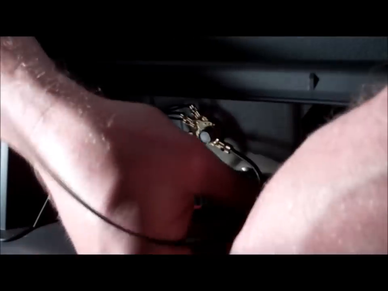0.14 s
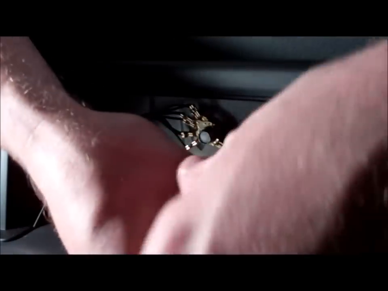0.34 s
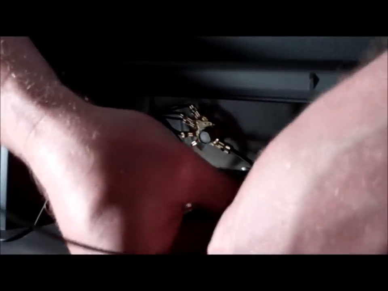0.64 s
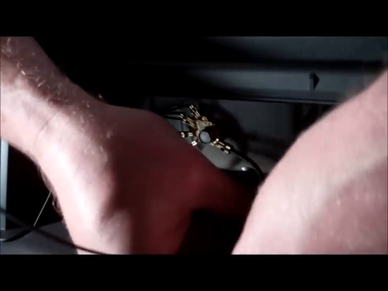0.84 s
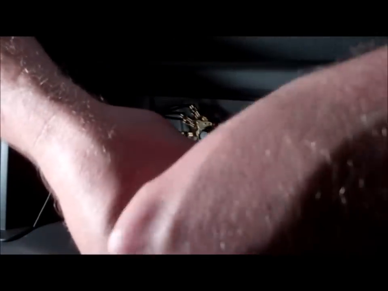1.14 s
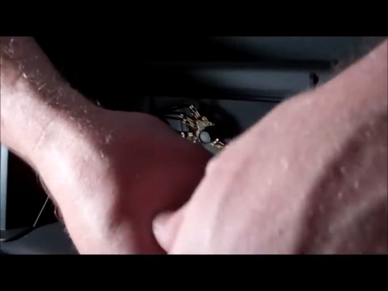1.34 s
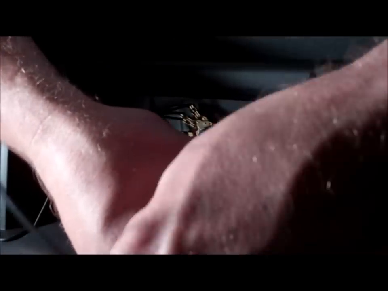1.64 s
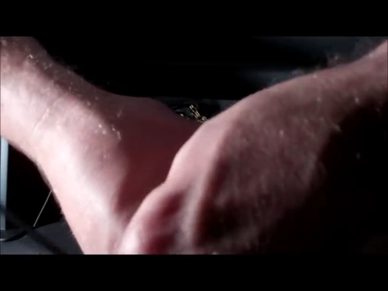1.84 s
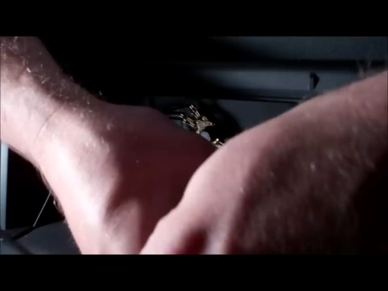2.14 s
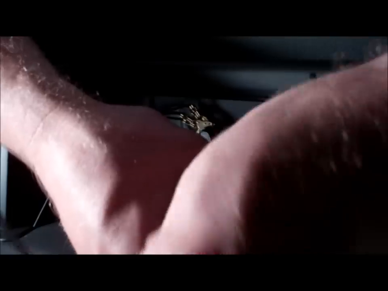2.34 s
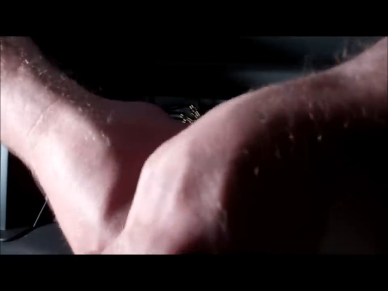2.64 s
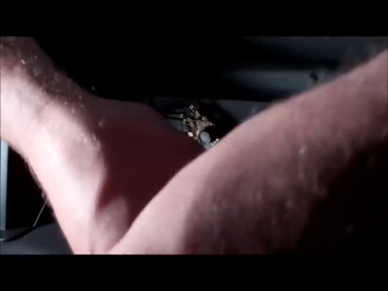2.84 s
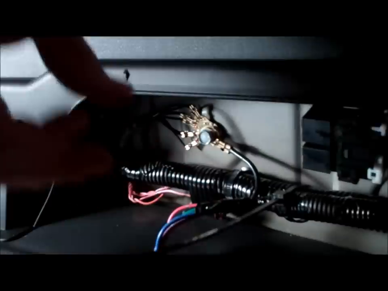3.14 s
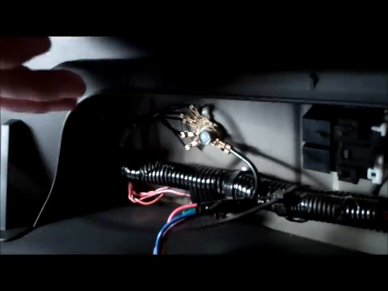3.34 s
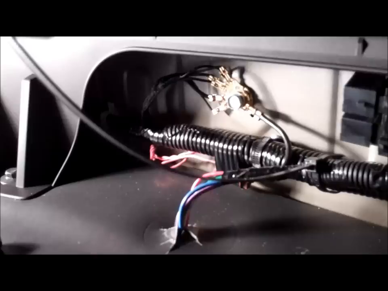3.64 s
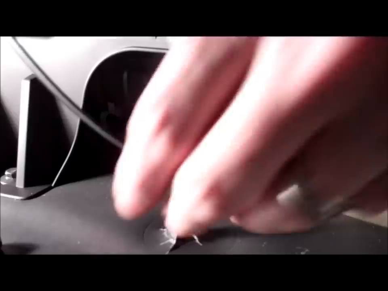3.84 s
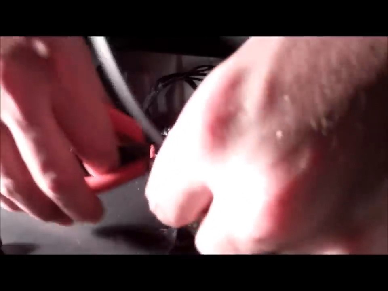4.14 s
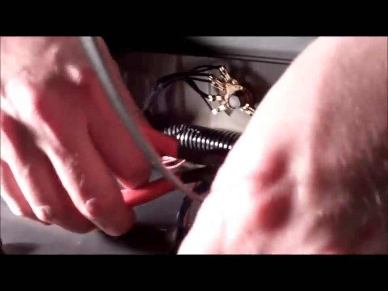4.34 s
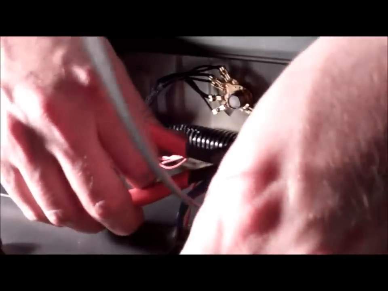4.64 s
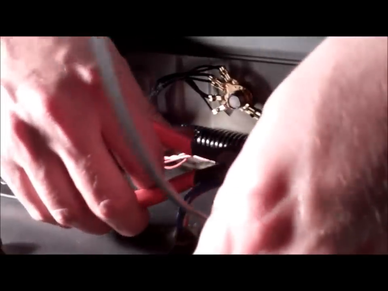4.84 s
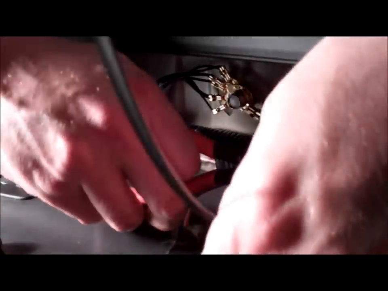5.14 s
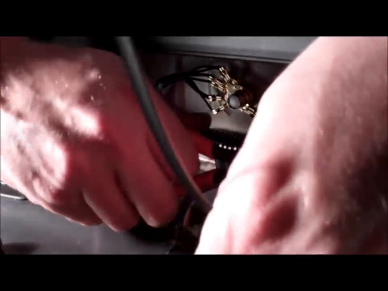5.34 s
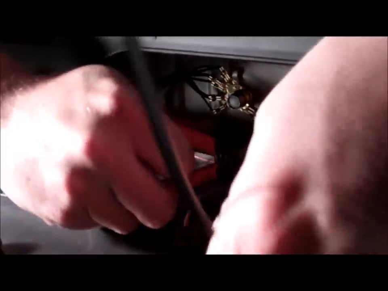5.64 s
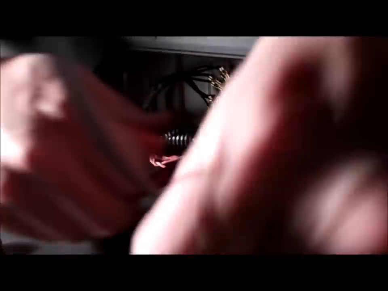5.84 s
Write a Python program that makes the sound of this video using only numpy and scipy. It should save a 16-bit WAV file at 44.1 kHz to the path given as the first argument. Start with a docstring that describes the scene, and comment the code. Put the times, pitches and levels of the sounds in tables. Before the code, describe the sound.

Light plastic ticks and strap rubbing, a sharp ratcheting zip, two late clicks, quiet fumbling, then one hard snip in a hushed vehicle footwell.

```python
"""A nylon zip tie is ratcheted tight round a wiring loom in a vehicle footwell, close to the microphone.
Each tooth is a set of filtered noise bursts: fast at first, then tooth by tooth.
Plastic ticks and knocks are ringing bursts; rubs and shoves are noise shaped by hand movements.
Cutters snip off the tail with a crack and a low thump, over the cabin's steady hush of coloured noise.
A gain control turns everything down briefly after the sharpest clicks."""
import sys
import numpy as np
from scipy import signal
from scipy.fft import rfft, irfft, next_fast_len
from scipy.io import wavfile
from scipy.ndimage import uniform_filter1d, minimum_filter1d

SR = 44100
rng = np.random.default_rng(int(sys.argv[2]) if len(sys.argv) > 2 else 0)


def to_wav(sig):
    """Store sig (one row per channel, or 1-D mono) as 16-bit WAV at the path in sys.argv[1].

    Samples outside -1..1 are clipped; the rate is SR.
    """
    pcm = np.clip(np.atleast_2d(sig), -1, 1) * 32767
    pcm = np.round(pcm).astype(np.int16)
    wavfile.write(sys.argv[1], SR, pcm.T)  # frames by channels


N = 264952
TIME = np.arange(N) / SR
BURST_TIME = TIME[:SR // 4]  # every burst lasts a quarter of a second


def from_db(db):
    """Turn decibels into a plain multiplier."""
    return 10 ** (np.asarray(db) / 20)


def rms_one(x):
    """Scale a sound so that its rms (average strength) is 1."""
    return x / np.sqrt(np.mean(x ** 2) + 1e-20)


def strength_one(x):
    """Scale a short stereo sound to the energy of 3 ms at rms 1."""
    reference = 2 * 0.003 * SR  # two channels
    return x / np.sqrt(np.sum(x ** 2) / reference + 1e-20)


def colour(x, spectrum):
    """Give a sound a spectrum with a minimum-phase filter, which never acts ahead of its input."""
    size = 2 * next_fast_len(x.shape[-1] // 2 + 1)
    pitch_hz, level_db = np.transpose(spectrum)
    bins_hz = np.arange(size // 2 + 1) * SR / size
    shape_db = np.interp(np.log(bins_hz + 1), np.log(pitch_hz), level_db)
    # folding the cepstrum onto positive time makes the filter minimum-phase
    cepstrum = irfft(np.log(from_db(shape_db)))
    cepstrum[1:size // 2] *= 2
    cepstrum[size // 2 + 1:] = 0
    response = np.exp(rfft(cepstrum))
    return irfft(rfft(x, size) * response)[..., :x.shape[-1]]


def resonate(x, hz, width_hz):
    """Ring at one pitch, with gain 1 at the peak; a wider resonance dies sooner."""
    r = np.exp(-np.pi * width_hz / SR)
    feed_in = np.array([1, 0, -1]) * (1 - r * r) / 2
    feed_back = [1, -2 * r * np.cos(2 * np.pi * hz / SR), r * r]
    return signal.lfilter(feed_in, feed_back, x + 1e-18)


# stereo width, as the side signal's level against the middle: (pitch_hz, side_minus_middle_db)
STEREO_WIDTH = [(30, -6), (150, -15.5), (400, -10), (1000, -10), (2300, -2.5), (4400, 0), (13000, -1)]


def spread(pair):
    """Turn two unrelated signals into left and right: alike in the bass, apart in the treble."""
    side = colour(pair[1], STEREO_WIDTH)
    return np.array([pair[0] + side, pair[0] - side])


def pan(x, db):
    """Make the left louder than the right by db."""
    return x * from_db([[db / 2], [-db / 2]])


def add(out, s, sound):
    """Mix a short sound in at time s (seconds)."""
    start = max(round(s * SR), 0)
    out[:, start:start + sound.shape[1]] += sound[:, :N - start]


def burst(t60, tail_db, tail_t60, direct, rise_s):
    """A contact: a spike, dense reflections off hands and trim, and the footwell's short tail.

    t60 and tail_t60 are the seconds each part takes to fall by 60 dB."""
    near_fade = from_db(-60 * BURST_TIME / t60)
    tail_fade = from_db(tail_db - 60 * BURST_TIME / tail_t60)
    build_up = 1 - np.exp(-BURST_TIME / rise_s)
    noise = rng.standard_normal((2, len(BURST_TIME)))
    contact = spread(noise * (near_fade + tail_fade) * build_up)
    contact /= np.sqrt(np.sum(contact ** 2) / 2)
    contact[:, round(min(rise_s, 0.005) * SR)] += direct  # the spike
    return contact


def hush(spectrum, drive=1):
    """Make coloured stereo noise at rms 1, cut off above 14150 Hz; drive varies its strength over time."""
    noise = colour(spread(drive * rng.standard_normal((2, N))), spectrum)
    top_cut = signal.ellip(10, 0.2, 70, 14150, fs=SR, output="sos")
    return rms_one(signal.sosfilt(top_cut, noise))


def friction(spectrum, per_s, grain_db, smooth):
    """Rubbing surfaces: tiny slips of uneven size over a smooth hiss, at rms 1 in all."""
    sizes = from_db(grain_db * np.minimum(rng.exponential(1, N), 4))
    slips = rms_one(sizes * (rng.random(N) < per_s / SR))
    return hush(spectrum, np.sqrt(slips ** 2 + smooth ** 2))


def stroke(s, length, attack_s, release_s):
    """A hand movement: it gathers speed, holds until its length is over, then dies away."""
    age = TIME - s
    gather = np.clip(age / attack_s, 0, 1)
    return gather * np.exp(-np.maximum(age - length, 0) / release_s)


# the pawl dropping over each tooth; levels are relative: (start_s, level_db)
TEETH = [(1.704, -5), (1.7067, -3.5), (1.712, -8), (1.7149, -5.5), (1.7192, -2.5), (1.726, -1),
         (1.7425, -3.5), (1.7634, -6), (1.8003, -5.5), (1.8245, -7), (1.847, -7), (1.8851, -7),
         (1.929, -5.5), (1.9835, -5.5), (2.074, -14), (2.2075, -45), (2.273, -41.5), (2.739, -7),
         (2.7872, -7)]
# each pull begins with a jerk that makes the head and strap louder: (start_s)
PULL_STARTS = [1.704, 2.739]
JERK_DB, JERK_FADE_S = 15, 0.0035
# relative spectra of the pawl's snap, the tie's head and the taut strap: (pitch_hz, level_db)
SNAP_COLOUR = [(1000, -56), (5000, -24), (9000, -19), (11500, -8.5), (13500, 2), (15000, -12), (19000, 3.5)]
TIE_HEAD_COLOUR = [(1000, -45), (3000, -24), (4500, -13), (6500, 0), (9500, 1.5), (12000, 1.5),
                   (16000, -17)]
STRAP_COLOUR = [(40, -1), (100, -7), (400, -2), (750, -1.5), (1300, -2.5), (1900, 0.5), (3500, -1),
                (6000, -8), (12000, -31)]


def ratchet(snap_db=8, head_db=-15, strap_db=-18, repeat=0.8):
    """The stiff little pawl snaps over each tooth; the head clacks and the taut strap clicks along."""
    out = np.zeros((2, N))

    def snap_burst():
        return burst(t60=0.011, tail_db=-39, tail_t60=0.12, direct=0.072, rise_s=0.003)

    # all teeth click at one spot, so much of the reflection pattern comes again each time
    common = snap_burst()
    for s, level_db in TEETH:
        nearest_s = min(abs(s - pull) for pull in PULL_STARTS)
        jerk_db = JERK_DB * np.exp(-nearest_s / JERK_FADE_S)
        snap = colour(repeat * common + np.sqrt(1 - repeat ** 2) * snap_burst(), SNAP_COLOUR)
        head = burst(t60=0.016, tail_db=-22.5, tail_t60=0.12, direct=0.18, rise_s=0.00085)
        head = colour(head, TIE_HEAD_COLOUR)
        strap = burst(t60=0.009, tail_db=-23.5, tail_t60=0.086, direct=0.23, rise_s=0.0006)
        strap = colour(strap, STRAP_COLOUR)
        add(out, s, from_db(level_db + snap_db) * strength_one(snap))
        add(out, s, from_db(level_db + head_db + jerk_db) * strength_one(head))
        add(out, s, from_db(level_db + strap_db + jerk_db) * strength_one(strap))
    return out


# tie, loom and cutters ticking on each other; levels are relative: (start_s, level_db, pitch_hz)
LIGHT_CONTACTS = [(0.1916, -13.5, 880), (0.2628, -30.5, 1350), (0.283, -28.5, 4900), (0.3014, -28.5, 825),
                  (0.731, -24.5, 696), (0.849, -17, 826), (0.9304, -12.5, 7250), (1.071, -27, 12000),
                  (2.761, -16, 2000), (2.8896, -22.5, 4000), (4.5477, -25.5, 3000), (4.9696, -31.5, 1954),
                  (5.0133, -41, 2100), (5.049, -38.5, 2200), (5.2073, -33, 790), (5.4622, -25, 1160),
                  (5.4822, -19, 3900), (5.4957, -38, 974), (5.8719, -24.5, 4800)]
# relative spectrum of the dry crack: (pitch_hz, level_db)
TICK_CRACK_COLOUR = [(60, -38), (600, -20), (2500, -7), (4500, -8), (8000, -2.5), (11000, -1), (13500, 1.5),
                     (15000, -5), (17000, -25)]
CUTTERS_IN_HAND_S = 4.3
STEEL_RING_DB = 11  # from then on, the steel jaws ring a part harder than nylon does


def ticks(crack_db=-8, ring_db=-18):
    """Light contacts: a dry crack and a longer ring of the part that was touched."""
    out = np.zeros((2, N))
    for s, level_db, hz in LIGHT_CONTACTS:
        crack = burst(t60=0.0088, tail_db=-21.5, tail_t60=0.07, direct=0.72, rise_s=0.0014)
        crack = colour(crack, TICK_CRACK_COLOUR)
        ring = burst(t60=0.033, tail_db=-22, tail_t60=0.15, direct=0.27, rise_s=0.00048)
        ring = resonate(ring, hz, width_hz=0.57 * hz)
        steel_db = STEEL_RING_DB * (s > CUTTERS_IN_HAND_S)
        add(out, s, from_db(level_db + crack_db) * strength_one(crack))
        add(out, s, from_db(level_db + ring_db + steel_db) * strength_one(ring))
    return pan(out, db=2.3)


# knuckles and tools knocking on the trim; levels are relative: (start_s, level_db, pitch_hz)
TRIM_KNOCKS = [(0.107, -47, 420), (0.189, -22.5, 1570), (0.445, -30.5, 415), (0.596, -32.5, 845),
               (0.743, -31.5, 447), (0.752, -38, 85), (0.845, -28, 1500), (0.865, -33, 105),
               (0.891, -33, 1510), (2.66, -15.5, 1900), (2.855, -39, 2040), (3.031, -39, 373),
               (3.176, -20, 312), (3.205, -31, 900), (3.212, -27.5, 222), (3.445, -23, 540),
               (3.507, -30, 264), (3.667, -33.5, 700), (4.345, -39, 800), (4.631, -30, 390),
               (4.969, -37, 440), (5.013, -28.5, 348), (5.047, -30, 430), (5.09, -37, 418),
               (5.179, -30, 150), (5.666, -27.5, 715), (5.812, -24, 190), (5.934, -44, 300)]
# ringing modes of the hollow trim panel; levels are relative: (pitch_hz, width_hz, level_db)
PANEL_MODES = [(171, 73, -4), (258, 75, -7), (427, 41, 12), (595, 190, 4.5), (753, 70, 7), (1290, 56, 2),
               (1780, 250, -7)]
PANEL_FOLLOWS = 0.52  # share of a blow's decibels that reaches the panel
CLICK_BAND_HZ = (1400, 2900)
HARD_HZ, CLICK_DB_PER_OCTAVE = 800, 19  # blows that ring lower than this are softer and click less


def knocks(panel_db=-22, spot_db=-8, click_db=-17):
    """Softer blows ring the trim panel's modes and one damped note of the spot that was hit."""
    out = np.zeros((2, N))
    click_band = signal.butter(2, CLICK_BAND_HZ, "band", fs=SR, output="sos")
    spot_top_cut = signal.butter(4, CLICK_BAND_HZ[1], fs=SR, output="sos")
    for s, level_db, hz in TRIM_KNOCKS:
        contact = burst(t60=0.024, tail_db=-19.5, tail_t60=0.22, direct=0.62, rise_s=0.0018)
        panel = 0
        for mode_hz, width_hz, mode_db in PANEL_MODES:
            panel = panel + from_db(mode_db) * resonate(contact, mode_hz, width_hz)
        spot = resonate(contact, hz, width_hz=0.43 * hz)
        spot = resonate(spot, hz, width_hz=0.78 * hz)
        spot = signal.sosfilt(spot_top_cut, spot)
        click = signal.sosfilt(click_band, contact)
        softness_db = CLICK_DB_PER_OCTAVE * min(np.log2(hz / HARD_HZ), 0)
        add(out, s, from_db(PANEL_FOLLOWS * level_db + panel_db) * strength_one(panel))
        add(out, s, from_db(level_db + spot_db) * strength_one(spot))
        add(out, s, from_db(level_db + click_db + softness_db) * strength_one(click))
    return out


# cutters closing through the tail; levels are relative: (start_s, level_db)
CUTS = [(5.7402, 5)]
# relative spectrum of the crack: (pitch_hz, level_db)
CUT_COLOUR = [(25, -15), (70, 0.5), (190, -1), (400, -8), (650, -14), (1050, -12), (2500, -16.5),
              (4500, -10), (8000, -6.5), (11000, -6.5), (13500, -2.5), (19000, -3.5)]


def snip(crack_db=11, jolt_db=0):
    """The jaws break the nylon and slam shut; the freed loom springs back with a low thump."""
    out = np.zeros((2, N))
    for s, level_db in CUTS:
        crack = burst(t60=0.051, tail_db=-27.5, tail_t60=0.29, direct=0.17, rise_s=0.001)
        crack = colour(crack, CUT_COLOUR)
        # a 75 Hz tone that falls by 60 dB in 25 ms
        jolt = np.sin(2 * np.pi * 75 * BURST_TIME) * from_db(-60 * BURST_TIME / 0.025)
        add(out, s, from_db(level_db + crack_db) * strength_one(crack) + from_db(level_db + jolt_db) * jolt)
    return pan(out, db=1.5)


# short tugs that feed the strap on: (start_s, level_db)
STRAP_TUGS = [(0.993, -40.5), (1.094, -46), (1.18, -49.5), (1.239, -42), (1.323, -40.5), (1.466, -35),
              (1.535, -37.5), (2.585, -44), (3.555, -48), (4.355, -47), (5.72, -29.5)]
TUG_S, TUG_RELEASE_S = 0.013, 0.027
# long draws through the fingers and over the conduit: (start_s, length_s, hiss_db, scrape_db)
STRAP_DRAWS = [(-0.03, .15, -44.5, -43.5), (0.251, 0.15, -42, -51), (0.573, 0.081, -49, -50),
               (0.834, 0.11, -48.5, -49.5), (2.399, 0.14, -48.5, -73), (2.654, 0.059, -45, -51),
               (2.91, 0.21, -50.5, -73), (3.178, 0.016, -39, -42), (4.106, 0.12, -52, -54.5),
               (5.517, 0.084, -41, -38)]
DRAW_ATTACK_S, DRAW_RELEASE_S = 0.021, 0.026
# relative spectra of the strap in the fingers and of the ribbed conduit: (pitch_hz, level_db)
FINGER_COLOUR = [(1000, -11), (3500, -7), (6000, -3), (9500, 0.5), (12000, 4), (13500, 11.5), (14400, -25)]
CONDUIT_COLOUR = [(100, -20), (350, 8.5), (800, 6.5), (1300, 3.5), (2000, 0.5), (4000, -2.5), (7000, -2),
                  (14000, -29)]


def rubbing():
    """The strap hisses through the fingers; on long draws it also scrapes over the ribbed conduit."""
    sliding = np.zeros(N)
    scraping = np.zeros(N)
    for s, level_db in STRAP_TUGS:
        sliding += from_db(level_db) * stroke(s, TUG_S, TUG_S, TUG_RELEASE_S)
    for s, length, hiss_db, scrape_db in STRAP_DRAWS:
        speed = stroke(s, length, DRAW_ATTACK_S, DRAW_RELEASE_S)
        sliding += from_db(hiss_db) * speed
        scraping += from_db(scrape_db) * speed
    scrape = scraping * friction(CONDUIT_COLOUR, per_s=900, grain_db=1.5, smooth=1.0)
    slide = sliding * friction(FINGER_COLOUR, per_s=4200, grain_db=9.0, smooth=1.7)
    return pan(scrape, db=0.7) + pan(slide, db=2.0)


# hands shoving the loom about, and the freed loom swinging just after the snip; levels are relative: (start_s,
# length_s, level_db)
LOOM_MOVES = [(-0.02, 0.019, -30), (0.715, 0.23, -48), (3.165, 0.034, -44.5), (3.495, 0.179, -49),
              (4.63, 0.27, -53.5), (4.955, 0.27, -47.5), (5.6, .12, -49.5), (5.762, 0.083, -42)]
SHOVE_ATTACK_S, SHOVE_RELEASE_S = 0.0072, 0.02
# relative spectra of the bumped loom and of the floor pan: (pitch_hz, level_db)
LOOM_COLOUR = [(20, -43), (45, -12), (85, -5.5), (180, 4.5), (400, -6.5), (700, -15.5), (1500, -26),
               (4000, -29)]
FLOOR_COLOUR = [(15, -19), (35, -39), (75, 6.5), (130, 1.5), (300, -13), (1000, -64)]


def shoving(handling_db=-1, thud_db=-4, creak_db=-7):
    """One effort bumps the loom, makes the floor pan thud and the conduit's ribs creak."""
    effort = np.zeros(N)
    for s, length, level_db in LOOM_MOVES:
        effort += from_db(level_db) * stroke(s, length, SHOVE_ATTACK_S, SHOVE_RELEASE_S)
    handling = from_db(handling_db) * friction(LOOM_COLOUR, per_s=230, grain_db=6.5, smooth=0.59)
    thuds = from_db(thud_db) * hush(FLOOR_COLOUR)
    ribs = friction(CONDUIT_COLOUR, per_s=200, grain_db=3.5, smooth=0.93)
    creaks = from_db(creak_db) * rms_one(resonate(ribs, hz=1570, width_hz=2200))
    return pan(effort * (handling + thuds + creaks), db=2.5)


# relative spectrum of the cabin's background: (pitch_hz, level_db)
CABIN_COLOUR = [(15, -72), (25, -14), (123, 1.5), (246, -2.5), (313, -6.5), (442, -3.5), (577, -8),
                (624, -11), (859, -3), (1350, -8.5), (1500, -12), (2070, -16.5), (3610, -18), (6150, -20.5),
                (14400, -16.5)]


def cabin_hush(level_db=-49.5):
    """The cabin's steady background, made of coloured noise."""
    return from_db(level_db) * pan(hush(CABIN_COLOUR), db=1.6)


def scene():
    """The work on the loom over the cabin's steady hush."""
    return ratchet() + ticks() + knocks() + snip() + rubbing() + shoving() + cabin_hush()


def gain_control(x, threshold_db=-49, most_db=15, hold_s=0.021, release_db_per_s=62):
    """Sound above 17 kHz pulls the gain down at once; it holds, then creeps back."""
    high_pass = signal.butter(12, 17000, "high", fs=SR, output="sos")
    top = signal.sosfilt(high_pass, x.mean(axis=0))
    power = np.abs(uniform_filter1d(top ** 2, size=128))
    loudness_db = 10 * np.log10(power + 1e-14)
    cut_db = np.clip(loudness_db - threshold_db, 0, most_db)
    half_hold = max(int(hold_s * SR / 2), 1)
    # the largest cut of the last hold_s seconds
    held_db = -minimum_filter1d(-cut_db, 2 * half_hold + 1, origin=half_hold)
    slope_db = release_db_per_s * TIME
    released_db = np.maximum.accumulate(held_db + slope_db) - slope_db
    return x * from_db(-uniform_filter1d(released_db, size=32))


def record(dry):
    """Apply gain control, a treble roll-off, overload on the loudest peaks and a steep top cut."""
    roll_off = signal.butter(14, 14250, fs=SR, output="sos")
    top_cut = signal.ellip(10, 0.1, 80, 16365, fs=SR, output="sos")
    rolled = signal.sosfilt(roll_off, gain_control(dry))
    overloaded = np.clip(rolled, -1, 1)
    return signal.sosfilt(top_cut, overloaded)


dry = scene()
out = record(dry)
to_wav(out)
```